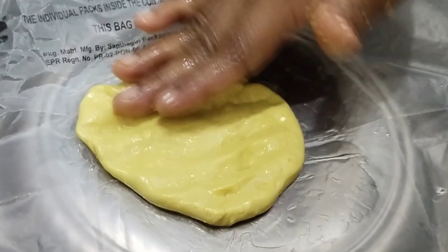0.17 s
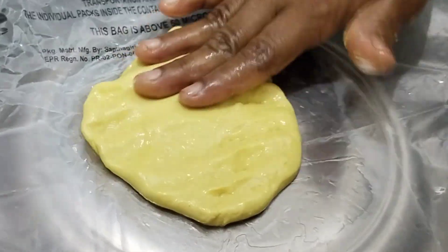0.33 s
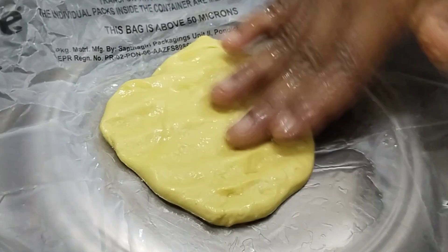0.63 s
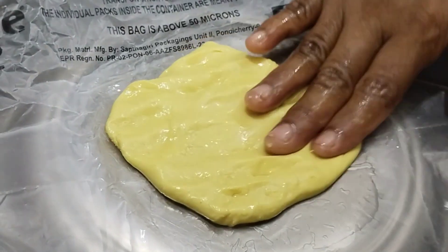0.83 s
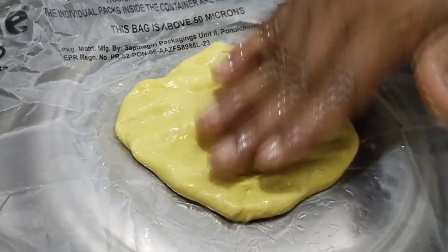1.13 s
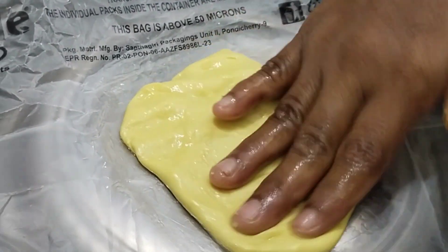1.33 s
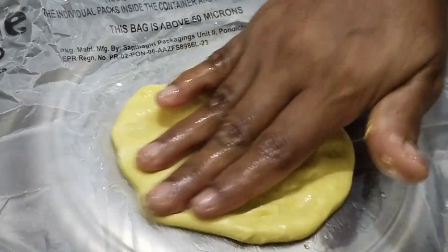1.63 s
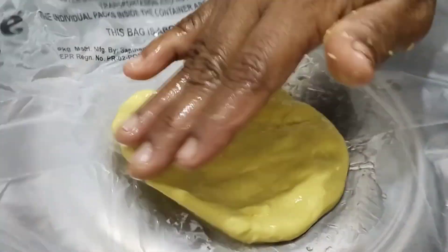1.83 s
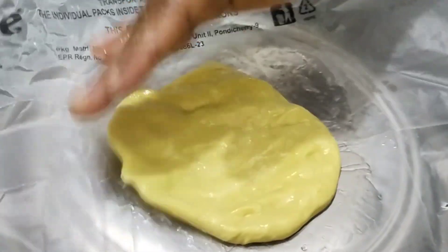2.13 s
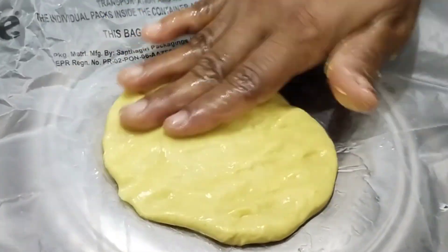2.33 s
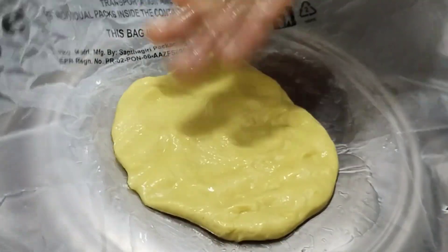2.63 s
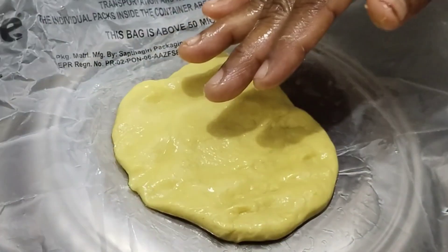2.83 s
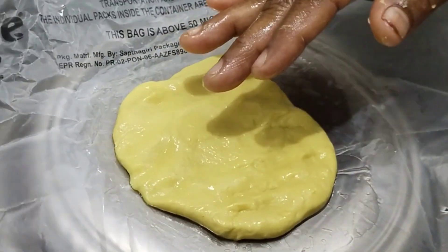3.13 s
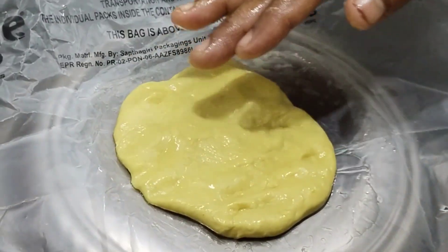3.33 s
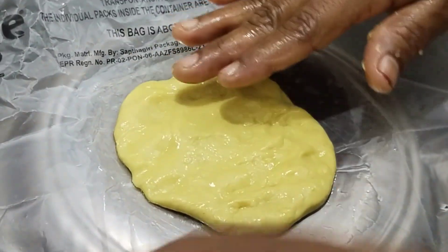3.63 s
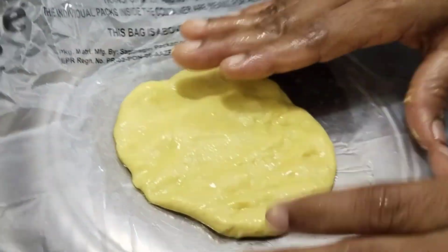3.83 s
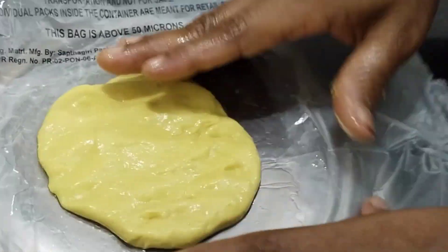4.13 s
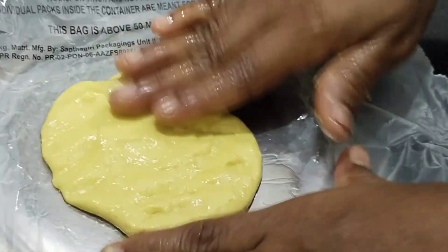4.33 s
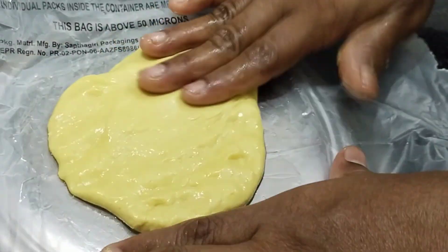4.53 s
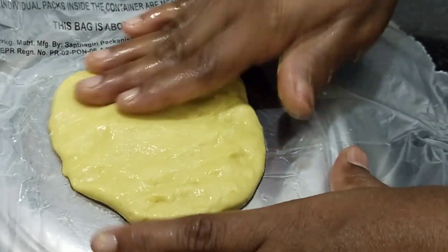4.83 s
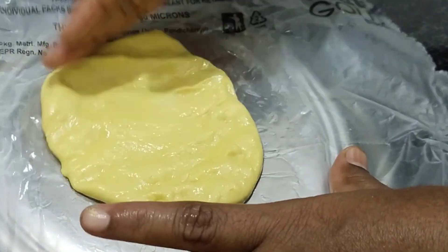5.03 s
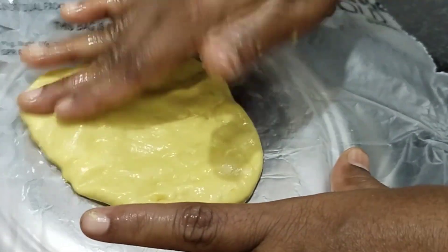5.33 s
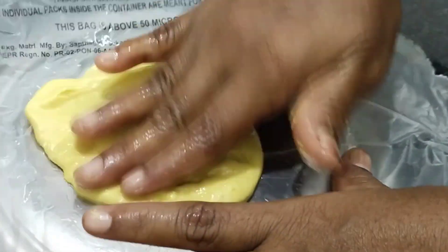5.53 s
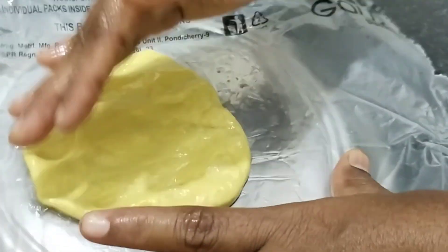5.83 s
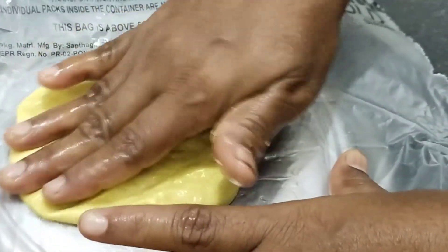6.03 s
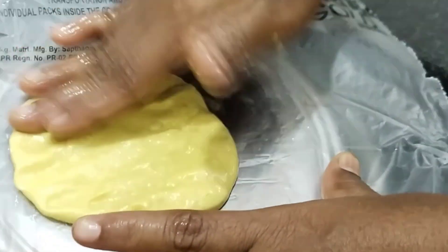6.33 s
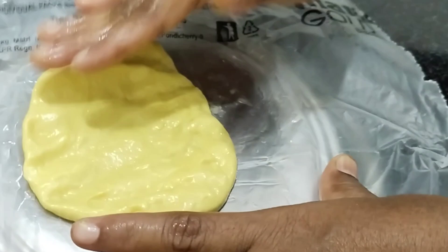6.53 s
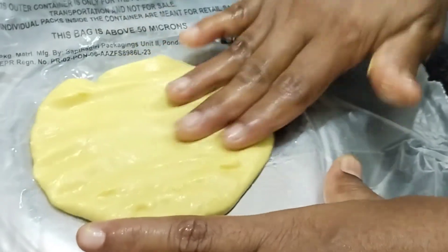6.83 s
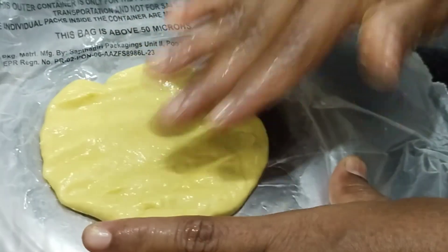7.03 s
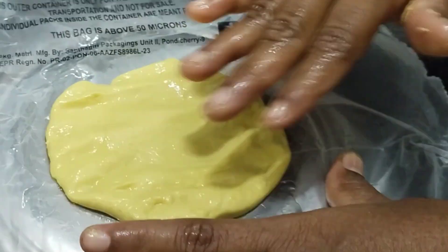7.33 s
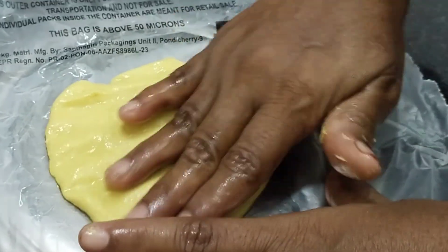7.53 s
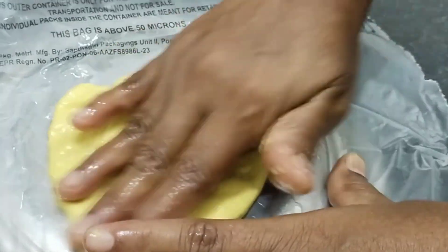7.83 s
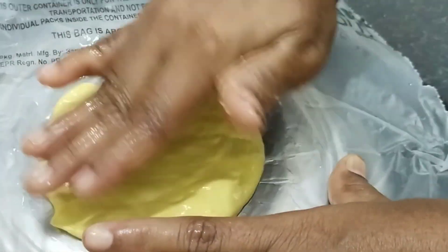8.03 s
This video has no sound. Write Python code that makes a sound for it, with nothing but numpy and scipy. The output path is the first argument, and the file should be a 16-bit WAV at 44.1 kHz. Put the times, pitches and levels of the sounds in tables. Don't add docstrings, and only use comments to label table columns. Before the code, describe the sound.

A few plastic ticks open, followed by a rough tray knock and one much louder, bright steel clang with quick bounces. After a quiet stretch with a soft bowl knock, plastic crinkles in irregular bursts, busiest in the middle and later part, mixed with dull hand thuds on a worktop. A phone close by hears small-kitchen echoes, low rumble, hiss and rasping night insects.

```python
import sys
import numpy as np
from scipy import signal
from scipy.fft import rfft, irfft, next_fast_len
from scipy.io import wavfile
from scipy.ndimage import uniform_filter1d, map_coordinates

SR = 44100
rng = np.random.default_rng(int(sys.argv[2]) if len(sys.argv) > 2 else 0)


def volts_from_db(level):
    exponent = np.asarray(level, float) / 20
    return 10 ** exponent


def pcm_store(signal):
    levels = np.round(np.clip(np.atleast_2d(signal), -1, 1) * 32767)
    wavfile.write(sys.argv[1], SR, levels.astype(np.int16).T)


N = 360297


def unit(x):
    return x / np.sqrt(np.mean(x ** 2) + 1e-20)


def along(points, hz):
    f, value = np.transpose(points)
    return np.interp(np.log(hz + 1), np.log(f + 1), value)


def level_curve(points):
    start, end = points[0][0], points[-1][0]
    s, db = np.transpose([(start - .02, -95), *points, (end + .06, -95)])
    return np.interp(np.arange(N) / SR, s, db)


def wobble(rate):
    knots = rng.standard_normal(int(N * rate / SR) + 4)
    return map_coordinates(knots, [np.arange(N) * rate / SR])


def filtered(x, response):
    n = x.shape[-1]
    m = next_fast_len(n + min(n, 8192), True)
    return irfft(rfft(x, m) * response(np.fft.rfftfreq(m, 1 / SR)), m)[..., :n]


def coloured(x, spectrum):
    return unit(filtered(x, lambda hz: volts_from_db(along(spectrum, hz))))


# f/Hz, likeness (1 = same, -1 = opposite)
PORT_LIKENESS = [(60, 0.92), (130, 0.98), (290, 0.88), (640, -0.14), (1410, -0.46), (3100, -0.3),
                 (6820, 0.014), (15000, -0.089)]


def paired(x):
    def turn(hz):
        return np.arccos(np.clip(along(PORT_LIKENESS, hz), -1, 1)) / 2

    mid, side = filtered(x, lambda hz: np.array([np.cos(turn(hz)), np.sin(turn(hz))]))
    return np.array([mid + side, mid - side])


def add(track, sound, s):
    part = track[:, round(s * SR):][:, :sound.shape[-1]]
    part += sound[..., :part.shape[-1]]


def ring(hz, t60, t, attack):
    return np.sin(2 * np.pi * hz * t) * volts_from_db(-60 * t / t60) * (1 - np.exp(-t / attack))


# f/Hz, t60/s (time to fall 60 dB)
KITCHEN_DECAY = [(100, 1), (1000, 0.5), (4000, 0.62), (8000, 0.46), (14000, 0.36)]


def dying(spectrum, length, scale):
    hz, t, z = signal.stft(rng.standard_normal((2, length)), SR, nperseg=128)
    t60 = scale * along(KITCHEN_DECAY, hz)[:, None]
    tail = signal.istft(z * volts_from_db(-60 * t / t60), SR, nperseg=128)[1][:, :length]
    tail = paired(filtered(tail, lambda f: volts_from_db(along(spectrum, f))))
    return tail / np.sqrt(np.mean(tail[:, :500] ** 2))


def room(x, wet_db):
    flat = [(20, 0), (20000, 0)]
    tail = np.pad(dying(flat, SR // 2, scale=1.0), ((0, 0), (300, 0)))
    tail = tail / np.linalg.norm(tail[0])
    return x + volts_from_db(wet_db) * signal.fftconvolve(x, tail, axes=1)[:, :N]


# t/s, level/dB
TRAFFIC_LEVEL = [(0, -56.5), (1.2, -65), (3.3, -63.5), (4.05, -61), (4.9, -66), (5.4, -59), (6.2, -65),
                 (7.6, -60.5), (8.0, -60), (8.17, -56)]
# f/Hz, level/dB
TRAFFIC_COLOUR = [(15, -32), (30, -19), (50, 18), (72, -1), (95, -29)]
# f/Hz, level/dB
HUM_COLOUR = [(60, -52), (80, -13), (100, 6), (130, -8.5), (160, -1.5), (220, -5), (260, -5), (320, 1),
              (390, -13), (520, -28.5)]
# f/Hz, level/dB
HISS_COLOUR = [(300, -73), (430, -14.5), (990, -16), (1350, -15), (2200, -21.5), (3250, -13), (4500, -24.5),
               (6600, -26.5), (8400, -24), (10500, -27.5), (12500, -94), (16000, -24)]


def air():
    hum_db, hiss_db = -51.5, -52.5
    noise = paired(rng.standard_normal((2, N)))
    rumble = volts_from_db(level_curve(TRAFFIC_LEVEL)) * coloured(noise, TRAFFIC_COLOUR)
    hum = volts_from_db(hum_db + 0.59 * wobble(5.0)) * coloured(noise, HUM_COLOUR)
    hiss = volts_from_db(hiss_db) * coloured(noise, HISS_COLOUR)
    return rumble + hum + hiss


# t/s, phrases sung so far
PHRASE_COUNT = [(.02, 0), (2.04, 8), (2.84, 11), (3.57, 14), (5.09, 20), (5.87, 23), (6.43, 25), (6.93, 27),
                (8.37, 33)]
# f/Hz, level/dB
WING_COLOUR = [(7300, -39), (7800, 3.5), (8300, 5), (8650, 2.5), (9000, -33)]
# t/s, level/dB
FAR_INSECT_LEVEL = [
    (6.7, -68),
    (6.928, -70),
    (7.216, -50),
    (7.518, -65),
    (7.93, -46),
    (8.0, -75),
]


def insects():
    phrase = np.interp(np.arange(N) / SR, *np.transpose(PHRASE_COUNT))
    swell = unit(0.81 + np.abs(np.sin(np.pi * phrase)) ** 1.3)
    noise = rng.standard_normal((2, N))
    sides = volts_from_db([[1.5], [-1.5]])
    near = volts_from_db(-54.5 + 1.5 * wobble(2.865)) * swell * coloured(noise, WING_COLOUR) * sides
    far = coloured(noise, [(6900, -30), (7120, -4), (7350, 0), (7550, -30)])
    return near + volts_from_db(level_curve(FAR_INSECT_LEVEL) - 7.0) * far


# t/s, peak level/dB, ring f/Hz
THICK_FOLDS = [(2.2938, -31.5, 1240), (2.306, -27.5, 3800), (2.6545, -25, 2840), (3.992, -25, 1270),
               (4.036, -21, 2060), (4.0502, -21.5, 3160), (4.1945, -27, 3170), (5.1493, -30.5, 3700),
               (5.19, -29.5, 3320), (5.911, -26, 2920), (5.9988, -41, 3030), (6.3275, -22, 3700),
               (6.381, -24, 3060), (6.645, -30, 3770), (6.668, -19.5, 3520), (2.0357, -34, 4230),
               (3.9806, -29, 1190), (5.2096, -30, 3550), (5.34, -38, 3040), (5.7967, -41, 1480),
               (5.932, -27, 2900), (5.9475, -31, 2780), (5.976, -29, 3280), (5.993, -25, 3400),
               (6.139, -32, 3280), (6.5937, -33.5, 3770), (8.0134, -29, 4000)]
# t/s, peak level/dB, ring f/Hz
THIN_FOLDS = [(0.231, -23, 3730), (1.8368, -32, 2900), (1.9105, -32, 2410), (2.0567, -28, 3630),
              (2.074, -26, 2900), (2.644, -23.5, 2720), (2.7427, -22.5, 1470), (3.323, -38, 2880),
              (4.001, -21, 2930), (4.0775, -21.5, 2770), (4.4792, -24.5, 2650), (4.5167, -19.5, 3630),
              (4.538, -22.5, 7960), (5.526, -18.5, 2080), (5.568, -21.5, 3130), (5.6274, -23, 1320),
              (5.9855, -20, 2940), (6.112, -29, 4600), (6.1856, -22, 2980), (6.277, -24.5, 3120),
              (6.5032, -26.5, 3700), (8.035, -24, 3800), (1.8317, -32, 4130), (5.365, -32, 8200),
              (5.589, -31, 4500), (2.328, -36, 3360)]
# t/s, peak level/dB, ring f/Hz
DULL_FOLDS = [
    (.101, -27, 1870),
    (.1135, -25, 2000),
    (2.619, -33, 975),
    (5.4902, -27.5, 2000),
    (5.604, -28, 1270),
    (4.1833, -25, 3020),
]
# t/s, peak level/dB, ring f/Hz
SHARP_FOLDS = [
    (.0605, -36, 5000),
    (.241, -23, 4560),
    (2.1979, -20.5, 5540),
    (4.4798, -27.5, 5020),
    (5.1507, -36, 5530),
    (5.8793, -28, 6000),
    (2.5127, -27, 3260),
]


def snaps():
    # folds, treble level/dB, t60 of the tick/s
    kinds = [(THICK_FOLDS, -12.5, .011), (THIN_FOLDS, -3.5, .010), (DULL_FOLDS, -34, .014), (SHARP_FOLDS, -4, .005)]
    out, t = np.zeros((2, N)), np.arange(SR // 12) / SR
    for folds, treble_db, tick_t60 in kinds:
        for s, db, hz in folds:
            treble = [(min(hz, 5000), 0), (5500, treble_db / 3), (9000, treble_db + 0.5),
                      (16000, treble_db - 10.0)]

            def colour(f):
                low_cut = f ** 3 / (f ** 3 + (0.37 * hz) ** 3)
                return low_cut * volts_from_db(along(treble, f))

            noise = filtered(rng.standard_normal((2, 2, len(t))), colour)
            noise /= np.sqrt(np.mean(noise[..., :SR // 500] ** 2, axis=-1, keepdims=True))
            tick = 1.38 * volts_from_db(-60 * t / tick_t60) * (1 - np.exp(-t / (tick_t60 / 25))) * noise[0]
            puff = 0.36 * volts_from_db(-60 * t / 0.12) * noise[1]
            facet = .5 * ring(hz, 12 / hz + 0.034, t, attack=0.000067)
            add(out, volts_from_db(db - 7.5) * (tick + puff + facet), s)
    return out


# t/s, hold/s, level/dB, air pocket f/Hz
PRESSES = [
    (.11, 0.011, -33, 1830),
    (2.64, 0.1, -43, 2480),
    (4.19, 0.12, -50.5, 3450),
    (5.158, 0.09, -46.5, 3600),
    (5.61, 0.027, -37.5, 1320),
    (5.915, 0.049, -39.5, 2850),
    (5.99, 0.012, -40, 3250),
    (6.295, 0.033, -36, 1980),
    (6.64, 0.03, -42.5, 1200),
    (6.74, 0.037, -45, 3150),
]
# t/s, hold/s, level/dB, air pocket f/Hz
SLIDES = [(1.916, 0.014, -38.5, 3070), (2.035, 0.065, -43, 3770), (2.207, 0.032, -39.5, 3000),
          (2.295, 0.056, -47, 3600), (2.45, 0.013, -45.5, 3200), (2.51, .01, -47, 3200),
          (2.74, 0.018, -38.5, 1500), (3.99, 0.037, -35, 1680), (4.035, 0.073, -37.5, 3200),
          (4.11, 0.16, -42.5, 3180), (4.76, 0.0074, -48.5, 3000), (5.52, 0.044, -36, 2180),
          (5.79, 0.011, -46.5, 2510), (6.265, 0.028, -42, 3040), (6.325, 0.039, -40, 3000),
          (6.38, 0.015, -38, 3350), (6.672, 0.02, -40.5, 3580)]
# t/s, hold/s, level/dB, air pocket f/Hz
PEELS = [(.232, 0.041, -46.5, 3220), (1.83, 0.013, -48, 5560), (3.175, 0.027, -48, 4740),
         (3.32, 0.029, -51, 5000), (4.486, 0.047, -43.5, 3340), (4.655, 0.011, -50.5, 2500),
         (4.94, 0.022, -54, 3500), (5.345, 0.055, -50, 3300), (5.884, 0.015, -42.5, 5000),
         (6.11, 0.086, -50, 3600), (6.183, 0.0098, -42.5, 3000), (6.5, 0.013, -46.5, 3700),
         (6.59, 0.009, -52, 3700), (7.995, 0.098, -43, 4070)]


def moves():
    # moves, rise/dB per s, fall/dB per s, sheen level/dB, slack level/dB, pocket level/dB
    kinds = [(PRESSES, 620, 340, -23, -14.5, 7), (SLIDES, 830, 360, -14.5, -11, 5.2),
             (PEELS, 1300, 290, -0.5, -13, 9.5)]
    rows = np.array([(*row, *kind) for table, *kind in kinds for row in table])
    s, hold, db, pocket_hz, rise, fall, sheen_db, slack_db, pocket_db = rows.T[..., None]
    t = np.arange(0, N / SR, .002)
    rising = rise * np.maximum(s - t, 0)
    falling = fall * np.maximum(t - s - hold, 0)
    power = volts_from_db(2 * (db - rising - falling)) + 1e-20
    levels = [np.sqrt(np.sum(power * volts_from_db(2 * gain_db), 0)) for gain_db in (0, sheen_db, slack_db)]
    share = power / power.sum(0)
    return t, levels, np.exp(np.sum(share * np.log(pocket_hz), 0)), np.sum(share * pocket_db, 0)


def pocket(x, s, pocket_hz, pocket_db):
    hz, t, z = signal.stft(x, SR, nperseg=256)
    distance = np.log((hz[:, None] + 1) / np.interp(t, s, pocket_hz)) / 0.31
    patches = uniform_filter1d(rng.standard_normal(z.shape[1:]), size=5, axis=0)
    patches = unit(uniform_filter1d(patches, size=5, axis=1))
    gain = volts_from_db(np.interp(t, s, pocket_db) * np.exp(-distance ** 2) + 4.5 * patches)
    power_before = np.sum(np.abs(z) ** 2, (0, 1))
    gain /= np.sqrt(np.sum(np.abs(gain * z) ** 2, (0, 1)) / power_before)
    return signal.istft(z * gain, SR, nperseg=256)[1][:, :N]


# f/Hz, level/dB
CRACKLE_COLOUR = [(450, -27), (700, 1.5), (1000, -4), (2090, 3.5), (2930, 2.5), (5000, -6), (7990, -7.5),
                  (9000, -21), (11700, -54), (19800, -120)]
# f/Hz, level/dB
SHEEN_COLOUR = [(5000, -3), (8000, 17), (10000, 3), (14500, -4), (16000, -20), (17000, -60)]
# f/Hz, level/dB
SLACK_COLOUR = [(200, -60), (330, 14), (520, -5), (700, -3.5), (1200, 11.5), (1700, -6)]


def sheet():
    s, levels, pocket_hz, pocket_db = moves()
    body, sheen, slack = (np.interp(np.arange(N) / SR, s, level) for level in levels)
    chance, luck = rng.random((2, N))
    size_db = np.minimum(-3 * np.log(luck + 1e-9), 6)
    buckles = (chance < 900 / SR) * volts_from_db(size_db)
    fade = np.exp(-np.arange(200) / 40)
    size = np.sqrt(np.convolve(buckles ** 2, fade)[:N] + .5)
    clumps = volts_from_db(np.clip(3.2 * wobble(70), -5, 4))
    grains = unit(size * clumps) * paired(rng.standard_normal((2, N)))
    crackle = pocket(coloured(grains, CRACKLE_COLOUR), s, pocket_hz, pocket_db)
    out = body * volts_from_db(-2.0) * crackle
    out = out + sheen * volts_from_db(-5.5) * coloured(grains, SHEEN_COLOUR)
    return out + slack * volts_from_db(2.0) * coloured(grains, SLACK_COLOUR)


# f/Hz, lead/radians
LEFT_LEAD = [(300, 0), (420, 1.2), (700, 0), (1100, -2.6), (1800, -2.8), (2900, -1.9), (3700, -2.2),
             (4500, -.3), (8000, 0)]


def knock(modes, blows, clatter, scale, split_hz, rough):
    out, t = np.zeros((2, N)), np.arange(SR) / SR
    hz, level_db, t60 = np.transpose(modes)[..., None]
    knots = rng.standard_normal((2, 2, len(modes), 128))
    swing = irfft(rfft(knots) * np.exp(-(np.arange(65) / split_hz) ** 2), SR)
    lead = along(LEFT_LEAD, hz) / 2 * np.array([1, -1])[:, None, None]
    turn = 2 * np.pi * (hz * t + rng.random(hz.shape)) + lead
    fade = volts_from_db(-60 * t / (0.5 * t60)) + volts_from_db(-13.5 - 60 * t / (1.79 * t60))
    beating = (1 + rough * unit(swing[0])) * np.sin(turn) + rough * unit(swing[1]) * np.cos(turn)
    waves = volts_from_db(level_db) * fade * beating
    metal = waves.sum(1) * (1 - np.exp(-t / 0.0008))
    for s, ring_db, clatter_db, thump_db, thump_hz in blows:
        thump = volts_from_db(thump_db) * ring(thump_hz, 20 / thump_hz, t, attack=0.0013)
        add(out, volts_from_db(ring_db) * metal + thump, s)
        add(out, volts_from_db(clatter_db) * dying(clatter, 3 * SR // 4, scale), s)
    return out


# f/Hz, level/dB
DULL_CLATTER = [(60, -14), (250, -6.5), (1000, 4), (2000, -1), (3500, -6), (5000, -18), (16000, -41)]
# f/Hz, level/dB, t60/s
TRAY_MODES = [(248.6, -4.5, .34), (320, -10, 0.29), (900, -3, 0.14), (1120, -10, 0.71), (1140, -7.5, .6),
              (1190, -6, 0.7), (1780, -3, .2), (2360, -7, .25), (2540, -13, .25), (2685, -11, 0.27),
              (2980, -18, .9), (3100, -15, .3), (3545, -15, .22), (3730, -14, .3)]
# t/s, ring level/dB, clatter level/dB, thump level/dB, thump f/Hz
TRAY_BLOWS = [
    (.3217, -55, -33, -17, 803),
    (.3225, -55, -38, -23, 1780),
    (.3232, -32, -34, -19, 295),
    (.333, -53, -55, -19, 1170),
    (.338, -50, -45, -20, 1150),
]


def tray():
    return knock(TRAY_MODES, TRAY_BLOWS, DULL_CLATTER, scale=0.49, split_hz=42, rough=0.76)


# f/Hz, level/dB, t60/s
POT_BODY = [(157, -16.5, 0.27), (261.4, -14, 0.4), (351, -11.5, 0.77), (367, -14.5, 0.76), (406, -9, 0.79),
            (423, -11, .65), (674, -10.5, 0.44), (791, -8, .5), (866, -22, 0.5), (1112, -10.5, 0.76),
            (1159, -12, 0.62), (1196, -11, 0.82), (1295, -12.5, 0.73), (1590, -13, .35)]
# f/Hz, level/dB, t60/s
POT_WALL = [(1762, -4.5, 0.55), (1774, -11, 0.73), (1828, -4, 0.72), (1885, -13, .6), (2118, -9, 0.56),
            (2090, -13, 0.71), (2271, -14, 0.48), (2520, -16, 0.52), (2655, -17, .4), (2850, -20, 0.76),
            (2900, -4.5, 0.6), (2928, 2, 0.57), (2960, 2.5, 0.68), (2985, -8, 0.79)]
# f/Hz, level/dB, t60/s
POT_RIM = [(3015, -6.5, 0.64), (3040, -12, 0.72), (3540, -13, .5), (3600, -11, 0.48), (3647, -10, 0.77),
           (3686, -7, 0.64), (3747, -7.5, 0.67), (4340, -19, 0.37), (4410, -20, 0.6), (4474, -12.5, 0.42),
           (4510, -14, 0.42), (5085, -4, 0.44), (5798, -18, .2), (6770, -25, .28)]
# f/Hz, level/dB
POT_CLATTER = [(60, -33), (150, -21), (400, -6), (1200, -3), (3300, -4.5), (4700, -11.5), (8000, -11.5),
               (12000, -29), (15500, -14), (17000, -82)]
# t/s, ring level/dB, clatter level/dB, thump level/dB, thump f/Hz
POT_BLOWS = [
    (0.5525, -44.5, -43, -21, 785),
    (0.5645, -28, -24.5, -15, 380),
    (0.5677, -14, -16.5, 3, 430),
    (0.5757, -34, -23, -5, 618),
    (.584, -35, -15, 3.5, 1170),
    (.598, -35, -18, 0.5, 1890),
    (.622, -37, -29, -19, 416),
]


def steel_pot():
    modes = POT_BODY + POT_WALL + POT_RIM
    return knock(modes, POT_BLOWS, POT_CLATTER, scale=0.67, split_hz=19, rough=0.42)


# f/Hz, level/dB, t60/s
BOWL_MODES = [(280, -9, 0.17), (472, -10, .2), (493, -4, .18), (545, -6, 0.27), (670, -2.5, 0.29),
              (945, -3.5, 0.1), (1060, -3, .2), (1176, -1, 0.15), (1380, -10, 0.22), (1820, -7, .13),
              (2410, -16, .3), (2900, -23.5, 0.59)]
# t/s, ring level/dB, clatter level/dB, thump level/dB, thump f/Hz
BOWL_BLOWS = [
    (1.306, -57, -52.5, -41, 900),
    (1.514, -40.5, -43.5, -29.5, 334),
    (1.525, -48, -53, -31, 480),
    (1.5355, -41, -41, -26, 495),
    (1.543, -41, -48, -27, 694),
    (1.57, -55, -59, -30, 1010),
]


def bowl():
    return knock(BOWL_MODES, BOWL_BLOWS, DULL_CLATTER, scale=0.59, split_hz=39, rough=0.87)


# t/s, peak level/dB, f/Hz, t60/s,
# edge level/dB
WORKTOP_THUDS = [(2.449, -47.5, 485, 0.021, 7), (2.618, -41, 706, 0.043, 6), (3.03, -44.5, 105, 0.17, 3),
                 (3.134, -45, 573, 0.12, 7), (3.276, -35, 500, 0.044, -7), (3.279, -28.5, 164.2, 0.18, -17),
                 (3.404, -33, 160, 0.17, -18), (4.001, -38.5, 385, 0.059, 2), (4.024, -41, 665, 0.044, 4),
                 (4.035, -40.5, 80, 0.11, 3), (4.111, -36, 680, 0.11, -2), (4.171, -41, 320, 0.14, 2),
                 (4.291, -31, 325, 0.052, -4), (4.951, -38.5, 148, 0.087, -11), (5.174, -31.5, 107, 0.12, -8),
                 (5.218, -31, 164, 0.097, -17), (5.35, -37, 170, 0.1, -16), (5.52, -44.5, 89, 0.67, -15),
                 (6.822, -39, 154, 0.21, -0.5), (6.822, -39, 97, 0.18, -23), (7.224, -36.5, 161, 0.23, -11),
                 (7.223, -37.5, 101, 0.19, -25)]


def thuds():
    edge_colour = [(60, -10.5), (400, -4.0), (900, -5.5), (2000, -65)]
    sag = 0.17
    out, t = np.zeros((2, N)), np.arange(SR // 2) / SR
    sagging = t + sag * 0.01 * (1 - np.exp(-t / 0.0088))
    for s, db, hz, t60, edge_db in WORKTOP_THUDS:
        edge = volts_from_db(edge_db - 6.0) * dying(edge_colour, SR // 8, scale=0.098)
        add(out, volts_from_db(db + 1.5) * ring(hz, t60, sagging, attack=0.0059), s)
        add(out, volts_from_db(db) * edge, s)
    return out


# t/s, length/s, level/dB, f/Hz
FINGER_RUBS = [
    (4.12, 0.2, -52.5, 3780),
    (5.905, .12, -45, 2900),
    (6.295, .06, -45, 2050),
    (5.175, .03, -43, 3500),
    (3.316, .03, -48.5, 9400),
    (5.975, .06, -47, 3200),
]


def squeaks():
    out, t = np.zeros((2, N)), np.arange(SR // 4) / SR
    for s, length, db, hz in FINGER_RUBS:
        narrow = [(.88 * hz, -30), (hz, 0), (1.12 * hz, -30)]
        whistle = coloured(rng.standard_normal((2, SR // 4)), narrow)
        swell = np.sqrt(np.abs(np.sin(np.pi * np.minimum(t / length, 1))))
        add(out, volts_from_db(db) * swell * whistle, s)
    return out


def scene():
    struck = room(steel_pot() + tray() + bowl() + thuds(), wet_db=-10.0)
    plastic = room(snaps() + sheet() + squeaks(), wet_db=-6.5)
    return struck + plastic + insects() + air()


# f/Hz, share of time missing
WEAK_BANDS = [(3800, 0), (4800, .07), (6200, .07), (7000, 0), (9000, 0), (10300, .36), (12700, .4),
              (13800, .05), (16000, .03)]


def thinned(x):
    hz, t, z = signal.stft(x, SR, nperseg=1024)
    field = rng.standard_normal(z.shape[1:])[::8, ::2]
    field = unit(uniform_filter1d(field, size=2, axis=1))
    field = field.repeat(8, axis=0).repeat(2, axis=1)[:len(hz), :len(t)]
    loud_db = uniform_filter1d(10 * np.log10(np.sum(np.abs(z) ** 2, (0, 1)) + 1e-12), size=9)
    more = np.clip(1 + (loud_db - np.median(loud_db)) / 30, 1, 1.6)
    share = along(WEAK_BANDS, hz)[:, None] * more
    dropped = 1 / (1 + np.exp(-1.7 * field)) < share
    kept = np.where(dropped, .005, 1 / np.sqrt(1 - share))
    return signal.istft(z * kept, SR, nperseg=1024)[1][:, :N]


def roll_off(x):
    return signal.sosfilt(signal.butter(12, 16610, fs=SR, output="sos"), x)


# f/Hz, left minus right level/dB
PORT_BALANCE = [(60, 0), (99, -1.5), (160, -3), (270, 0.5), (450, 4), (740, -4), (1220, 0.5), (2010, 2.5),
                (3330, 10), (5500, -0.5), (9080, 5.5), (15000, 2)]


def record(dry):
    top_hz = 15750
    halves = np.array([[.5], [-.5]])
    x = filtered(dry, lambda hz: volts_from_db(along(PORT_BALANCE, hz) * halves) * (hz < top_hz))
    level_db = 10 * np.log10(np.abs(uniform_filter1d(np.mean(x ** 2, 0), 400)) + 1e-12)
    fall_db = 14 * np.arange(N) / SR
    held_db = np.maximum.accumulate(level_db + fall_db) - fall_db
    x = x * volts_from_db(-.3 * uniform_filter1d(np.maximum(held_db + 22.5, 0), 600))
    x = x / (1 + np.abs(x) ** 6) ** (1 / 6)
    mix = thinned(x)
    return roll_off(mix)


dry = scene()
out = record(dry)
pcm_store(out)
```